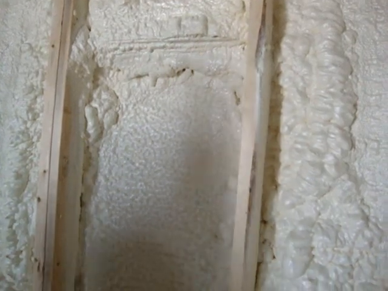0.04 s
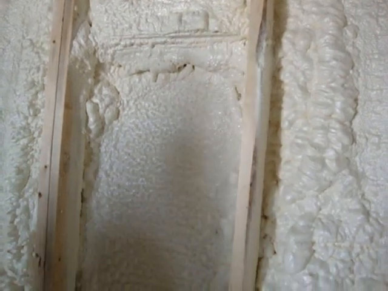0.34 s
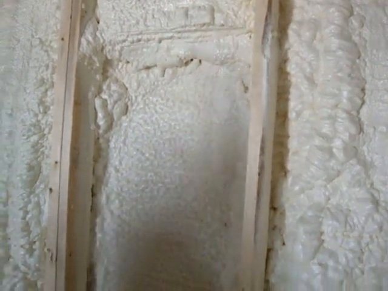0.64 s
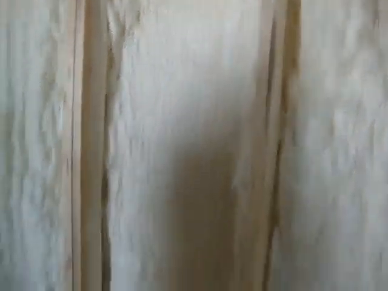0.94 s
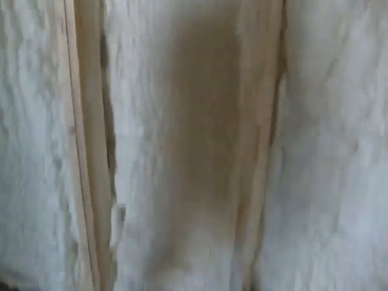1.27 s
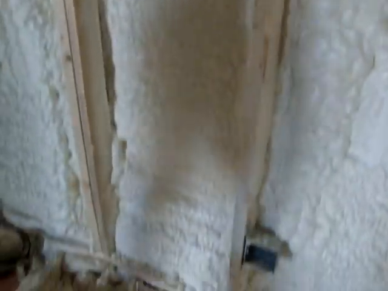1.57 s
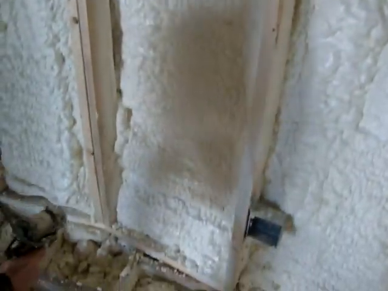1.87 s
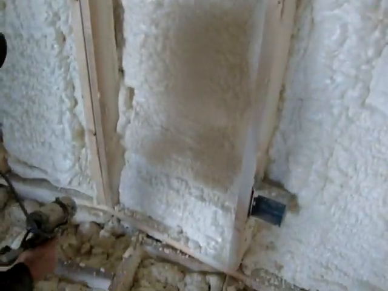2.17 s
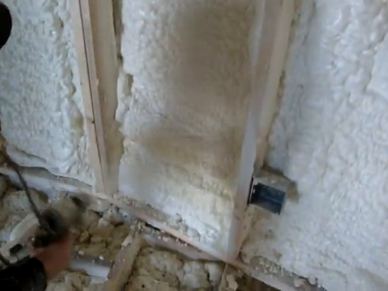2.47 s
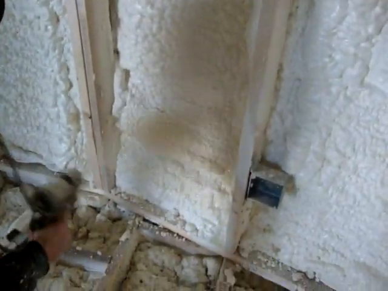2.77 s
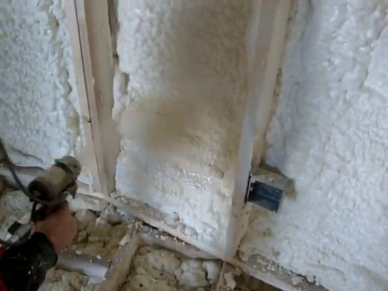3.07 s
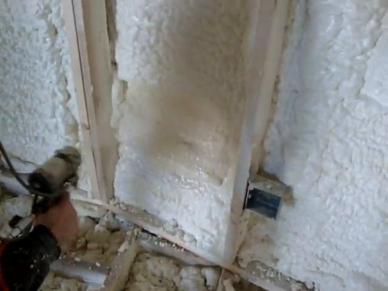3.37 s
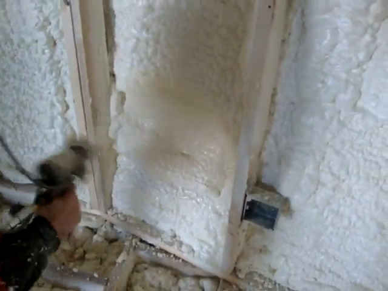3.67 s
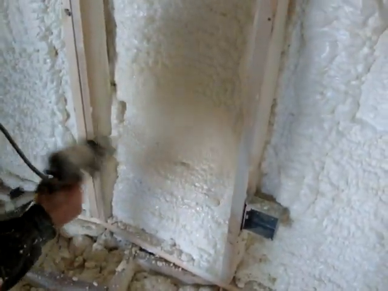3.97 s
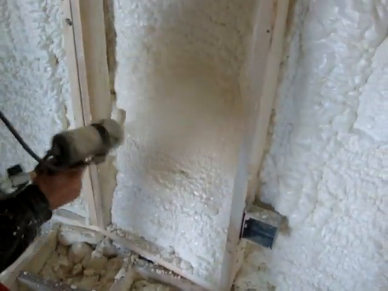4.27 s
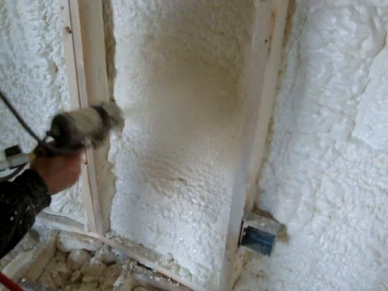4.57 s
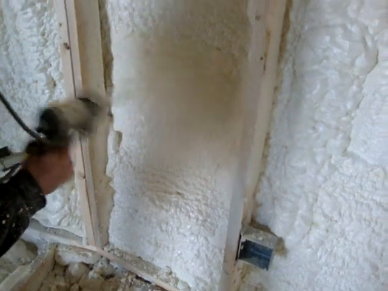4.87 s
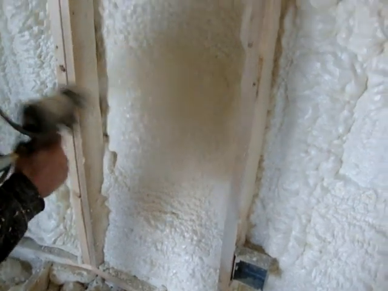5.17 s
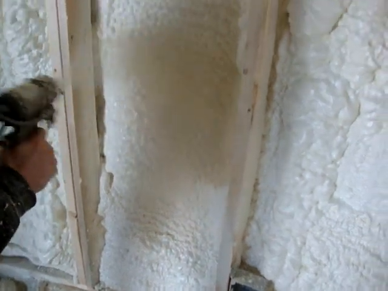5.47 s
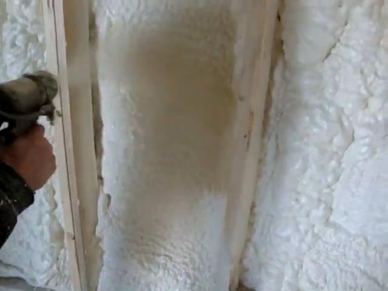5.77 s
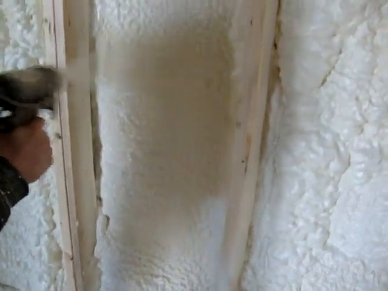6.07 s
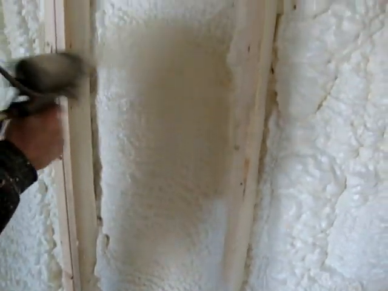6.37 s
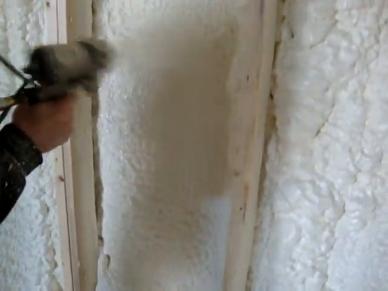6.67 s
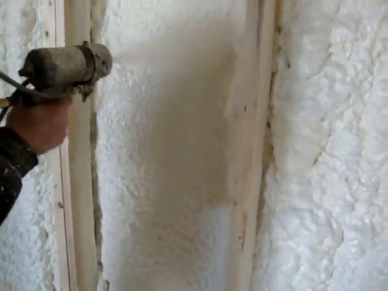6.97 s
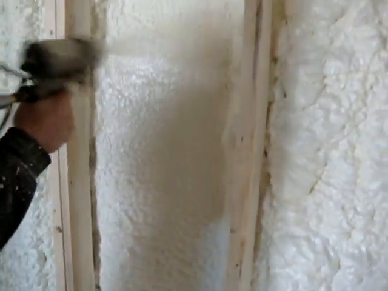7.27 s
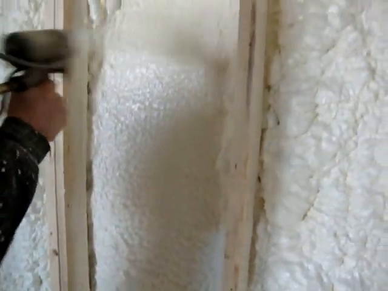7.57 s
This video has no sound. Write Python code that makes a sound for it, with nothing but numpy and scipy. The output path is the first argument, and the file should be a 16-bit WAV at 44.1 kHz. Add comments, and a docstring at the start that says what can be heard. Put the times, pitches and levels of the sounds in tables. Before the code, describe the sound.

Thin air hiss from a spray gun gives way to insulation foam spraying onto a wall, over a swelling generator drone.

```python
"""First you hear air hissing from a foam gun as it is carried along a gap between wall studs.
Echoes off nearby surfaces give the hiss a shifting, hollow tone. The trigger then cuts the air,
and a fuller spray builds up as insulation foam hits the wall. Behind it all, the generator of
the spray rig drones through the building, louder once the foam flows."""
import sys
import numpy as np
from scipy import signal
from scipy.io import wavfile
from scipy.ndimage import uniform_filter1d, map_coordinates

SR = 44100
rng = np.random.default_rng(int(sys.argv[2]) if len(sys.argv) > 2 else 0)


def unload_audio(sound):
    """Save the sound as a 16-bit wav file, at the path given as the first command line argument."""
    columns = np.transpose(np.atleast_2d(sound))
    # keep every value between -1 and 1, then stretch to whole-number steps
    steps = np.round(np.clip(columns, -1, 1) * 32767)
    wavfile.write(sys.argv[1], SR, steps.astype(np.int16))


N = 336832
TRIGGER_S, FOAM_S = 2.281, 2.289  # the air shuts off, the foam starts
TREBLE_LIMIT_HZ = 10170


def amp(db):
    """Turns decibels into a gain to multiply by."""
    return 10 ** (np.asarray(db) / 20)


def unit(x):
    """Scales a signal to an average size (rms) of 1."""
    return x / np.sqrt(np.mean(x ** 2) + 1e-20)


def step(t, at_s, over_s):
    """A smooth rise from 0 to 1 around a moment."""
    return (1 + np.tanh((t - at_s) / over_s)) / 2


def follow(rows, t):
    """Reads a table's columns at times t, gliding between rows."""
    times, *columns = np.transpose(rows)
    return [np.interp(t, times, column) for column in columns]


def colour(points, hz):
    """Reads a table of tone colour: the level in dB at each pitch."""
    pitches, db = np.transpose(points)
    return np.interp(np.log(hz + 1), np.log(pitches + 1), db)


def grid(size):
    """Times (a column) and pitches (a row) for sound cut into short frames."""
    hop = size // 4
    return np.arange(N // hop + 5)[:, None] * hop / SR, np.fft.rfftfreq(size, 1 / SR)


def drift(t, rate_hz):
    """A random wander of rms 1, no faster than rate_hz."""
    rates = rate_hz * np.geomspace(1 / 10, 1, num=20)
    return unit(sum(np.sin(2 * np.pi * (rate * t + rng.random())) for rate in rates))


def patches(shape, frame_count, bin_count):
    """Random blotches of rms 1 over time and pitch."""
    smooth_in_time = uniform_filter1d(rng.standard_normal(shape), frame_count, 0)
    return unit(uniform_filter1d(smooth_in_time, bin_count, 1))


def noise(shape_db, size):
    """Noise of rms 1, shaped by a grid of levels over time and pitch."""
    spectrum = rng.standard_normal(shape_db.shape) + 1j * rng.standard_normal(shape_db.shape)
    spectrum *= amp(shape_db)
    return unit(signal.istft(spectrum.T, nperseg=size, noverlap=size - size // 4)[1][:N])


def rumble(level_db=-77, corner_hz=100, uneven_db=4, uneven_hz=6):
    """A faint, uneven rumble in the building."""
    t, hz = grid(size=2048)
    treble_cut_db = 20 * np.log10(1 + (hz / corner_hz) ** 2)
    return amp(level_db) * noise(uneven_db * drift(t, uneven_hz) - treble_cut_db, size=2048)


# Tone colour of the rig's roar: pitch_hz, relative_db
ROAR_COLOUR = [(25, -43.5), (60, -28), (105, -25.5), (140, -17.5), (180, -5.5), (240, -4), (300, -0.5),
               (480, -4.5), (850, -4), (1250, -5.5), (1550, -7.7), (2400, -9.5), (4000, -17.5),
               (10000, -33)]
def roar(boom_db=1.5, boom_hz=340, width_hz=70, waver_db=0.5, waver_hz=6, patchy_db=1.0):
    """The rig roars through the room, whose low boom stands out and wavers."""
    t, hz = grid(size=2048)
    boom = (boom_db + waver_db * drift(t, waver_hz)) * np.exp(-((hz - boom_hz) / width_hz) ** 2)
    blotches = patchy_db * patches(boom.shape, frame_count=10, bin_count=5)
    return noise(colour(ROAR_COLOUR, hz) + boom + blotches, size=2048)


# Loud spots the listener passes through: peak_s, half_length_s, shaft_multiple, lift_db
WHINE_SWELLS = [(.3, .3, 32, 9), (.5, 0.62, 18, 3), (.7, .2, 20, 5), (3.15, .35, 18, 9),
                (3.27, 0.14, 20, 8.5), (5.25, 0.33, 20, 7.5), (5.3, 0.95, 12, 7), (6.7, .4, 20, 7)]
def whine_gain(t, multiple, db, fading_db=1.5, fading_hz=2):
    """One whine swells and fades in the room's loud and quiet spots (standing waves)."""
    lift_db = sum(lift * np.exp(-((t - peak_s) / half_s) ** 2)
                  for peak_s, half_s, which, lift in WHINE_SWELLS if which == multiple)
    return amp(db + lift_db) * unit(amp(fading_db * drift(t, fading_hz)))


# The generator's tones: shaft_multiple, relative_db
GENERATOR_TONES = [ (3, -24), (5, -18), (7.5, -24.5), (8, -23), (9, -23), (9.5, -21.5), (10.5, -24.5),
                   (12, -19), (14, -20.5), (16, -19.5), (18, -18.5), (19, -23.5), (20, -16), (22, -19),
                   (26, -24), (28, -23), (32, -20), (36, -23.5), (38, -26)]
def generator_whine(shaft_hz=60.05, wander_hz=0.2396, wander_rate_hz=1.4):
    """The generator whines at multiples of its shaft speed, which its governor lets wander a little."""
    t, frames = np.arange(N) / SR, grid(size=2048)[0][:, 0]
    speed_hz = shaft_hz + wander_hz * drift(frames, wander_rate_hz)
    turns = np.cumsum(np.interp(t, frames, speed_hz)) / SR
    whine = np.zeros(N)
    for multiple, db in GENERATOR_TONES:
        gain = np.interp(t, frames, whine_gain(frames, multiple, db))
        whine += gain * np.sqrt(2) * np.sin(2 * np.pi * (multiple * turns + rng.random()))
    return whine


# Loudness of the rig's drone: time_s, level_db
DRONE_LEVELS = [(0, -41.5), (.65, -39.5), (1.3, -42.5), (2.05, -45.5), (2.28, -43.5), (2.68, -32.5),
                (3.1, -33.5), (4.8, -32.5), (5.4, -31), (7.15, -30.5), (7.64, -28.5)]
def rig(roar_gain_db=0.57, whine_gain_db=-0.2):
    """Roar and whine rise and fall together as one drone."""
    level_db = follow(DRONE_LEVELS, np.arange(N) / SR)[0]
    return amp(level_db) * (amp(roar_gain_db) * roar() + amp(whine_gain_db) * generator_whine())


# Brief ringing peaks in the hiss, where narrow bands of pitch stand out as the gun moves:
# peak_s, half_length_s, pitch_hz, half_width_hz, lift_db
HISS_PEAKS = [(.96, 0.027, 6500, 597, 2.5), (1.283, .06, 6150, 250, 5.5), (1.72, .06, 4530, 450, 0.5),
              (1.83, .04, 3450, 250, 5), (1.9, 0.11, 9200, 800, 6.5), (2.02, .07, 7370, 280, 4),
              (5.1, .05, 7660, 555, 3), (5.73, 0.065, 4150, 890, 3)]
def jet(level_db, brightness, tone_colour, patchy_db, flutter_db, flutter_hz):
    """The gun's hiss: narrow bands of pitch briefly stand out, and the whole level flutters."""
    t, hz = grid(size=512)
    octaves = np.log2(np.clip(hz, 2000, 10000) / 6000)
    shape_db = colour(tone_colour, hz) + brightness * octaves
    for peak_s, half_s, pitch_hz, half_hz, lift_db in HISS_PEAKS:
        shape_db += lift_db * np.exp(-((t - peak_s) / half_s) ** 2 - ((hz - pitch_hz) / half_hz) ** 2)
    shape_db = np.where(hz < TREBLE_LIMIT_HZ + 500, shape_db, -100)
    # Even out the frames, so a change of tone leaves the level alone.
    shape_db -= 10 * np.log10(np.mean(amp(shape_db) ** 2, axis=1, keepdims=True))
    shape_db += patchy_db * patches(shape_db.shape, frame_count=26, bin_count=7)
    shape_db += flutter_db * drift(t, flutter_hz)
    return noise(shape_db, size=512) * amp(np.interp(np.arange(N) / SR, t[:, 0], level_db[:, 0]))


def delayed(x, ms):
    """The sound after a travel time that may change as things move."""
    return map_coordinates(x, [np.arange(N) - ms * SR / 1000], order=3)


# The echo as the gun nears the wall: time_s, delay_ms, strength (0 to 1)
WALL_APPROACH = [(0, 0.88, 0), (1.2, 0.46, 0.06), (1.62, 0.51, 0.25), (1.8, 0.365, 0.3), (2.0, 0.29, 0.1),
                 (2.12, 0.31, 0)]
# Wall, stud and floor each scale that echo: delay_factor, strength_factor
ECHO_SURFACES = [(0.99, 1), (1.52, 0.26), (.5, 0.35)]
def close_echoes(direct, stray_strength=0.18, stray_ms=2.2, sway=0.1, sway_hz=0.95):
    """Moving echoes boost some pitches and cancel others (a comb filter)."""
    t = np.arange(N) / SR
    near_ms, near_strength = follow(WALL_APPROACH, t)
    paths = [(farther * near_ms, share * near_strength) for farther, share in ECHO_SURFACES]
    frames = t[::512]
    for k in range(3):  # echoes from farther off wander as the hand sways
        delay_ms = stray_ms * (1 + k / 2) * (1 + sway * drift(frames, sway_hz))
        paths.append((np.interp(t, frames, delay_ms), stray_strength))
    heard = direct + sum(strength * delayed(direct, ms) for ms, strength in paths)
    return heard / np.sqrt(1 + sum(strength ** 2 for _, strength in paths))


# The air hiss as the gun is carried: time_s, level_db, brightness_db_per_octave
AIR_HISS = [(0.0, -32.5, 1.2), (.42, -32.5, 0), (.53, -30, 0), (.86, -32, -1), (1.22, -30, -0.2),
            (1.48, -31, -1), (1.77, -27.5, -2.5), (1.94, -28.4, -0.6), (2.14, -29, -0.1)]
# Tone colour of the air: pitch_hz, relative_db
AIR_COLOUR = [(100, -60), (1000, -27), (2000, -13.5), (3000, -8.5), (4000, -5.5), (5000, -2.5),
              (6600, -1.5), (8200, -1.5), (9900, -3)]
def idle_air(gain_db=0.1):
    """The idle gun blows air to keep itself clear, until the trigger shuts it off."""
    level_db, brightness = follow(AIR_HISS, grid(size=512)[0])
    hiss = jet(level_db, brightness, AIR_COLOUR, patchy_db=1.2, flutter_db=0.5, flutter_hz=24.45)
    air_on = 1 - step(np.arange(N) / SR, TRIGGER_S, over_s=0.0039)
    return amp(gain_db) * close_echoes(hiss) * air_on


def aim(t, open_s=2.57, nearest_s=4.7, full_db=-26, far_db=-3, weak_db=-6.5,
        swing_hz=3.898, slowing_hz_per_s=0.18, swing_db=0.68):
    """Spray level and brightness: the fan opens, the gun nears, the wrist swings ever more slowly."""
    since_peak_s = t - 2.68
    swing = np.cos(2 * np.pi * (swing_hz - slowing_hz_per_s * since_peak_s / 2) * since_peak_s)
    swing *= 1 - step(t, at_s=5.95, over_s=0.22)  # the hand steadies near the top of the gap
    distance_db = np.interp(t, [open_s, nearest_s], [far_db, 0])
    opened = step(t, open_s, over_s=0.035)
    level_db = full_db + distance_db + weak_db * (1 - opened) + swing_db * swing * opened
    brightness = 0.4 - 0.21 * (t - FOAM_S) + 0.34 * swing  # dB per octave; dulls as foam builds up
    return level_db, brightness


# Tone colour of the foam spray: pitch_hz, relative_db
SPRAY_COLOUR = [(80, -52), (500, -15), (1500, -10.5), (2500, -6.5), (3500, -3.5), (5000, -1), (7000, -1),
                (8600, 0), (9900, -4)]
def foam_spray(drops_relative_db=-13, drops_per_s=2500, waver_db_per_octave=0.5, waver_hz=5):
    """Foam breaks into mist at the nozzle, and a dense shower of droplets ticks on the wall."""
    t, frames = np.arange(N) / SR, grid(size=512)[0]
    level_db, brightness = aim(frames)
    brightness += waver_db_per_octave * drift(frames, waver_hz)
    mist = jet(level_db, brightness, SPRAY_COLOUR, patchy_db=1.02, flutter_db=0.64, flutter_hz=40.14)
    hits = (rng.random(N) < drops_per_s / SR) * rng.standard_normal(N)
    ticks = signal.sosfilt(signal.butter(2, [1500, 9000], "band", fs=SR, output="sos"), hits)
    drops = amp(drops_relative_db + aim(t)[0]) * unit(ticks)
    return (mist + drops) * step(t, FOAM_S, over_s=0.0057)


def scene():
    """Gun, rig and building together, the same in both ears."""
    heard = idle_air() + foam_spray() + rig() + rumble()
    return np.array([heard, heard])


def record(dry):
    """A steep filter removes the highest treble."""
    taps = signal.firwin(1023, TREBLE_LIMIT_HZ, window=("kaiser", 9), fs=SR)
    return signal.oaconvolve(dry, taps[None], "same", axes=1)


dry = scene()
out = record(dry)
unload_audio(out)
```